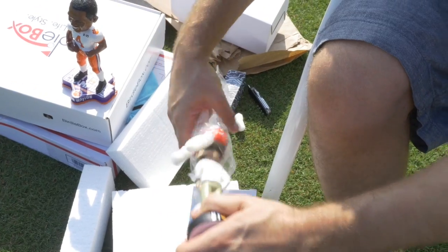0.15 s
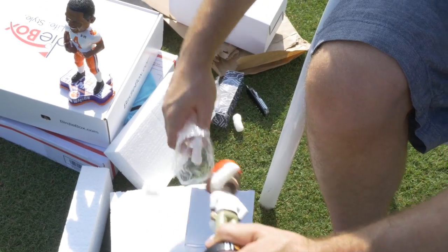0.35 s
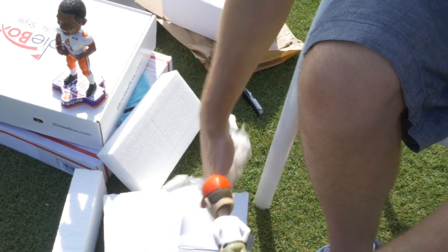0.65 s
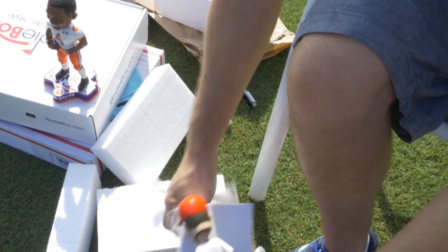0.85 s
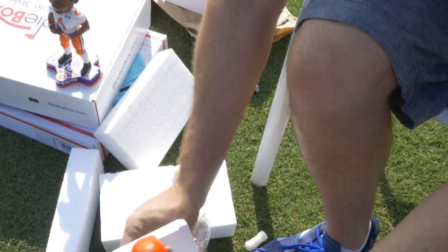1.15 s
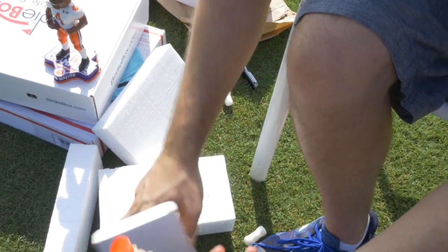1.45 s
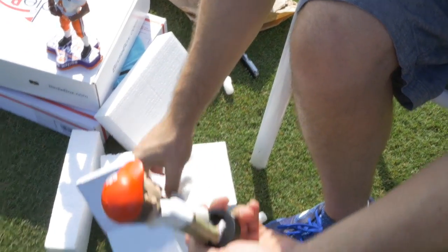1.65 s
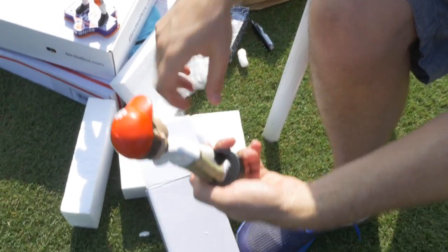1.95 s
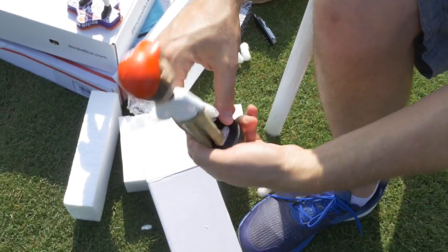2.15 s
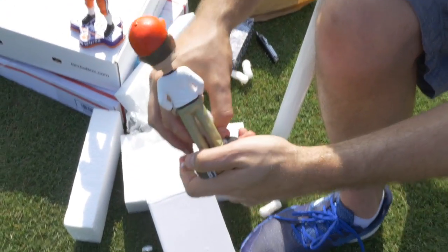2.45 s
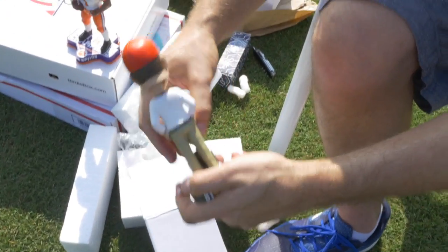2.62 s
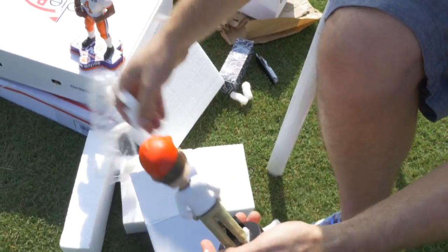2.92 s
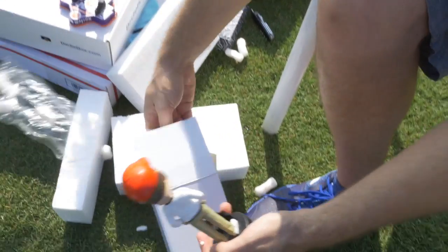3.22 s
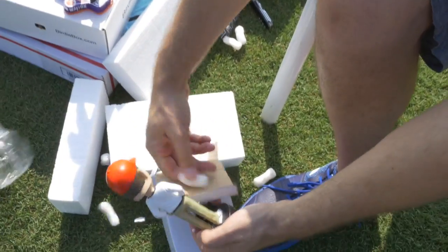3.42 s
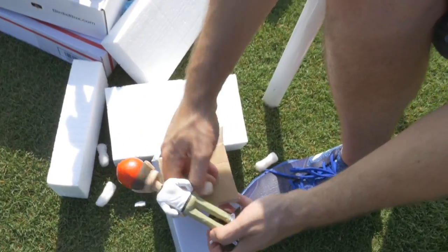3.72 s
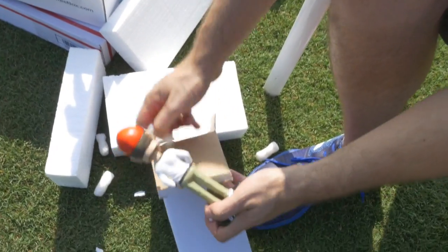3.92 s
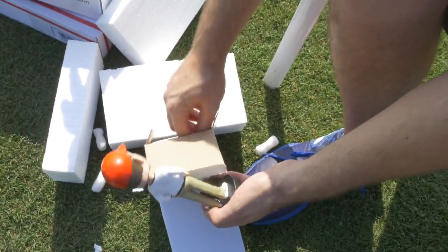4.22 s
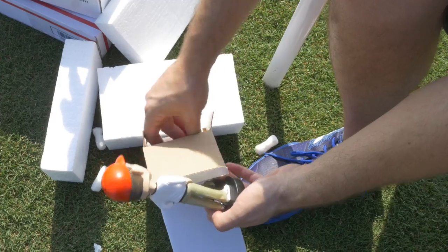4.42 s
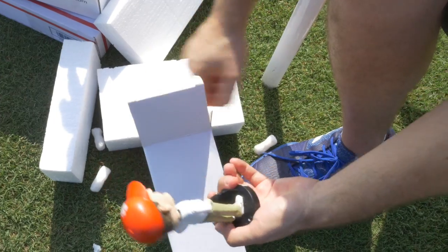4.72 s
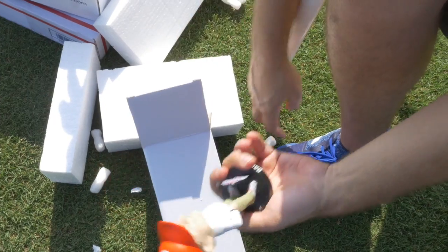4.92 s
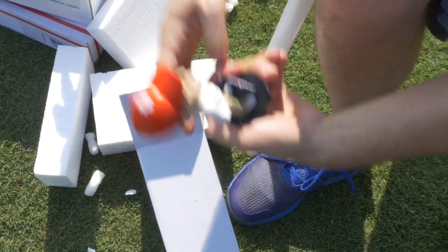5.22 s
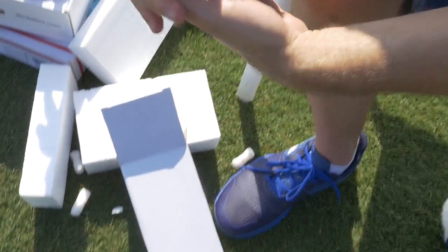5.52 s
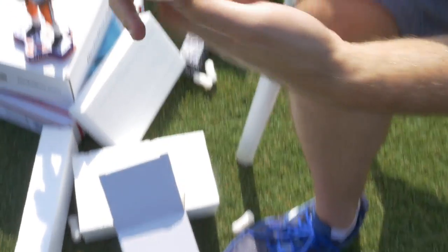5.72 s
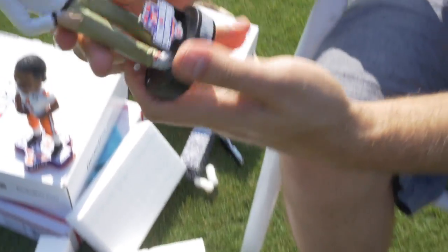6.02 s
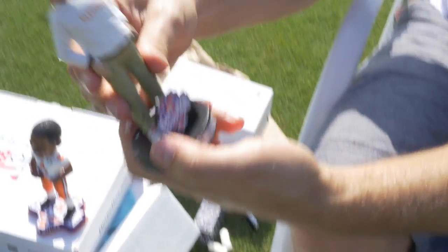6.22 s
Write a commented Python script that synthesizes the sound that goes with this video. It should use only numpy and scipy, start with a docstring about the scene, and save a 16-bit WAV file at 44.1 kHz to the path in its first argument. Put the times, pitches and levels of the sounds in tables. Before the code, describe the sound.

Crinkling film, hollow cardboard and foam thumps and small dry clicks of a bobbing toy head, close up on a lawn with distant traffic.

```python
"""Outdoors on a lawn, hands pull thin plastic wrap off a figurine and shift foam blocks and a card box.
The wrap hisses with clumped noise slips, crackles with short pops and snaps with noise bursts.
The box knocks with decaying modes and a noisy crack; the figurine's loose head ticks on its spring as modes.
Underneath lie far traffic (shaped noise), an engine drone (wavering sine) and insects (sines and noise)."""
import sys
import numpy as np
from scipy import signal
from scipy.fft import rfft, irfft
from scipy.io import wavfile
from scipy.ndimage import uniform_filter1d

SR = 44100
rng = np.random.default_rng(int(sys.argv[2]) if len(sys.argv) > 2 else 0)


def generate_wav(signal):
    """Clip the signal to [-1, 1] and save it as 16-bit WAV at the path in sys.argv[1]."""
    frames = np.transpose(np.atleast_2d(signal))
    scaled = np.clip(frames, -1, 1) * 32767
    pcm = np.round(scaled).astype(np.int16)
    wavfile.write(sys.argv[1], SR, pcm)


N = 280696


def gain_of(db):
    """Decibels to amplitude."""
    return 10 ** (np.asarray(db) / 20)


def evened(x):
    """Scaled to unit rms."""
    return x / np.sqrt(np.mean(x ** 2) + 1e-20)


def curve(rows):
    """Columns of a time table, interpolated at every sample."""
    s, *columns = np.transpose(rows)
    return [np.interp(np.arange(N) / SR, s, c) for c in columns]


def add(mix, s, sound):
    """Mixes a sound in at time s, in place."""
    part = mix[round(s * SR):][:len(sound)]
    part += sound[:len(part)]


def colour(x, shape):
    """Shapes x by a spectrum of (frequency [Hz], level [dB]), to unit rms."""
    hz, db = np.transpose(shape)
    f = np.fft.rfftfreq(N, 1 / SR) + 1
    shape_db = np.interp(np.log(f), np.log(hz), db, -100, -100)
    return evened(irfft(rfft(x) * gain_of(shape_db), N))


def wander(cutoff_hz):
    """Slow random drift of unit rms: low-passed noise."""
    lowpass = signal.butter(2, cutoff_hz, fs=SR, output="sos")
    return evened(signal.sosfilt(lowpass, rng.standard_normal(N)))


def ring(modes, rise_s):
    """Decaying modes, peak 1; each blow detunes them slightly and gives them random polarity."""
    hz, db, t60 = np.transpose(modes)[:, :, None]
    t = np.arange(SR // 8) / SR
    detune, way = rng.standard_normal((2, *hz.shape))
    decay = gain_of(db - 60 * t / np.maximum(t60, .003))  # no mode dies faster than 3 ms
    x = np.sign(way) * decay * np.sin(2 * np.pi * hz * (1 + .012 * detune) * t)
    x = x.sum(0) * (1 - np.exp(-t / rise_s))  # the contact takes a moment
    return x / abs(x).max()


def puff(lo_hz, hi_hz, t60):
    """A short decaying burst of band noise, peak 1."""
    t = np.arange(SR // 16) / SR
    band = signal.butter(3, [lo_hz, min(hi_hz, SR * .45)], "band", fs=SR, output="sos")
    burst = rng.standard_normal(len(t)) * gain_of(-60 * t / max(t60, .001))
    x = signal.sosfilt(band, burst)
    return x / abs(x).max()


def peaks(rows, floor_db):
    """Level in dB of a floor plus peaks that rise and fall evenly in dB; their powers add."""
    slope_db = 12  # change over one rise or fall time
    t, power = np.arange(N) / SR, gain_of(floor_db) ** 2
    for s, db, rise, fall in rows:
        away = np.where(t < s, (s - t) / rise, (t - s) / fall)
        power = power + gain_of(db - slope_db * away) ** 2
    return 10 * np.log10(power)


def traffic():
    """Far traffic wash: broad noise, weighted low, that swells a little."""
    # traffic spectrum: (frequency [Hz], density [dB per Hz])
    wash_shape = [(20, -30), (45, -10.5), (90, 2), (150, -3), (400, -13), (650, -20), (1120, -21),
                  (1900, -34), (3500, -40.5), (7000, -65), (10500, -67), (11400, -78), (15900, -70)]
    level_db = -43 + 0.86 * wander(1.8)
    return gain_of(level_db) * colour(rng.standard_normal(N), wash_shape)


def engine_drone():
    """Distant engine: one sine at the firing rate, unsteady in pitch and level."""
    # engine course: (time [s], mean firing rate [Hz], mean level [dB])
    engine_course = [(0, 148, -55.5), (.9, 152.2, -51), (1.25, 154, -48), (1.55, 140.5, -50),
                     (1.8, 124.3, -50.5), (2.3, 127.9, -41.5), (2.8, 133.4, -42.5), (3.5, 139, -41),
                     (4.2, 145.3, -44), (4.8, 148, -42.5), (5.5, 152.2, -44.5), (5.9, 140, -52),
                     (6.4, 135, -46.5)]
    hz, db = curve(engine_course)
    turns = np.cumsum(hz * (1 + .012 * wander(10))) / SR
    gusts_db = 2.6 * wander(14)  # air on the way makes the tone come and go
    return np.sqrt(2) * gain_of(db + gusts_db) * np.sin(2 * np.pi * turns)


def cricket():
    """Bouts of evenly spaced sine pulses, each gliding down and louder than the one before."""
    # cricket bouts: (start time [s], first pulse level [dB])
    bouts = [(4.645, -68), (4.897, -76), (5.13, -76), (5.478, -74), (5.835, -77), (6.102, -72)]
    # size of each bout: (pulses [count])
    pulse_counts = [1, 2, 3, 2, 1, 4]
    gap_s, swell_db, pulse_s = 0.039, 3.5, 0.031
    out, t = np.zeros(N), np.arange(round(pulse_s * SR)) / SR
    glide = np.sin(2 * np.pi * (4520 * t - 4000 * t ** 2))
    pulse = np.sqrt(2) * glide * signal.windows.tukey(len(t), .6)
    for (s, db), count in zip(bouts, pulse_counts):
        for k in range(count):
            add(out, s + k * gap_s, gain_of(db + k * swell_db) * pulse)
    return out


def insect_chorus():
    """Far insects blended into a narrow band of flickering noise."""
    # chorus spectrum: (frequency [Hz], density [dB per Hz])
    chorus_shape = [(9000, -14), (9600, 0), (10100, -3), (10700, -3), (11200, -16)]
    level_db = -72 + 1.3 * wander(30)
    return gain_of(level_db) * colour(rng.standard_normal(N), chorus_shape)


def insect_trill():
    """A thin, faint sine near 8450 Hz with unsteady pitch, throbbing level and bursts."""
    # trill bursts: (peak time [s], level [dB], half length [s])
    bursts = [(4.79, -76, .015), (5.34, -74, .1), (5.62, -69, .05), (5.81, -65, .03), (6.04, -68, .06),
              (6.09, -65, .04)]
    turns = np.cumsum(8450 * (1 + 0.00334 * wander(64))) / SR
    throb_db = 3.5 * wander(45)
    trill_db = peaks([(s, db, half, half) for s, db, half in bursts], -90)
    return gain_of(trill_db + throb_db) * np.sin(2 * np.pi * turns)


def head_ticks():
    """The loose head meets the neck, rings in short modes with a hard edge, and bounces once."""
    # contacts: (time [s], level [dB], nominal contact pitch [Hz], other head modes [relative dB],
    # hard edge [relative dB], bounce [relative dB])
    ticks = [(.1525, -35, 2250, 5, -5, -12), (.17, -33, 3080, -13, 2, -15), (.183, -29, 2480, -5, -16, -26),
             (.4888, -35.5, 2410, -6, -20, -4), (1.1038, -34.5, 2250, -17, -11, -6),
             (1.368, -28, 1950, -9, -3, -20), (1.4644, -38.5, 2030, -12, -14, -15),
             (1.5523, -27, 2210, -8, -12, -20), (1.7044, -35, 1870, -5, 2, -21),
             (1.9904, -36.5, 2020, -3, -13, -6), (2.3284, -40.5, 2040, -4, -11, -15),
             (2.3561, -38, 1960, 0.1, -7, -23), (2.4226, -42, 1860, -4, 1, 5),
             (2.511, -41, 2020, -10, -9, -6), (2.6803, -40.5, 1900, -6, -7, -7),
             (3.3174, -34.5, 1780, -1, -3, -11), (3.495, -31, 2150, 5, -4, -13),
             (3.5574, -30.5, 1890, 3, 2, -0.6), (3.722, -39, 2150, -3, -9, -7),
             (3.7504, -46, 2706, 4, -11, -17), (3.769, -45, 2690, 3, -12, -19),
             (5.2215, -41, 1930, -12, -5.5, 4.5), (5.411, -32.5, 1970, -22, -22, -15),
             (5.4546, -26.5, 2230, -29, -8, -15), (5.4595, -27, 1960, -17, -21, -28),
             (5.6045, -44.5, 1950, -16, -4, 0), (5.6342, -40, 1840, -11, -13, -21),
             (5.7358, -25.5, 1820, -1, -1, -9.5), (5.7675, -44, 1730, -5, 0, -17),
             (5.819, -44, 1850, -10, -9, -10), (5.9118, -26.5, 1890, -5.5, -2.5, -7),
             (6.0295, -33.5, 1970, 4.5, -16, 0.3), (6.2166, -31, 1982, 2.5, -12, -18),
             (6.2354, -43, 2006, 0, -15, -12), (6.3205, -47, 1785, -3, -7, -9),
             (6.3335, -41.5, 2360, -3, -21, -8)]
    # head modes: (nominal frequency [Hz], level [dB], t60 [s])
    head_modes = [(2480, 0, .02), (2750, -7, .014), (3080, -5, .014), (3500, -8, .012), (4200, -11, .01)]
    # hard edge modes: (nominal frequency [Hz], level [dB], t60 [s], at least 0.003 in use)
    shell_modes = [(5000, -1, 0.0046), (5840, 5, 0.0028), (6500, -12, 0.0038), (7930, -2, 0.0055),
                   (10700, 4.5, 0.0027)]
    contact_t60, bounce_s = .017, .0093  # s; the neck damps the head at once
    out = np.zeros(N)
    for s, db, hz, rest_db, hard_db, bounce_db in ticks:
        head = ring([(hz, 0, contact_t60)], .0003) + gain_of(rest_db) * ring(head_modes, .0003)
        first = head + gain_of(hard_db) * ring(shell_modes, .0002)
        bounce = head + gain_of(hard_db - 2) * ring(shell_modes, .0002)  # softer edge
        add(out, s, gain_of(db) * first)
        add(out, s + bounce_s, gain_of(db + bounce_db) * bounce)
    return out


def box_knocks():
    """Blows on box and foam: the struck wall, low walls and small flaps ring, with punch and crack."""
    # blows: (time [s], level [dB], nominal pitch of the struck wall [Hz], low walls [relative dB],
    # small flaps [relative dB])
    knocks = [(0.4337, -19, 722, -6.5, -27), (.621, -31, 407, 2.5, -24), (.702, -33, 428, 0, -5),
              (0.8162, -27.5, 450, 3, -10), (0.8275, -21, 572, 0.5, -0.5), (.834, -21, 560, 1.5, -20),
              (0.8887, -29, 366, 6.5, 11.5), (0.894, -25, 557, -3, -12), (.904, -39, 290, 17, 10),
              (.913, -34, 577, -3, 4.5), (.959, -37.5, 364, 6, 2), (1.136, -36, 534, -11, 0),
              (1.464, -35.5, 513, 1.5, -18), (1.554, -38, 813, 6.5, 8), (1.618, -30, 457, -9, -19),
              (1.974, -37.5, 383.5, -0.5, -12), (3.197, -34, 450, -16, -7), (3.232, -35, 778, 2, -10),
              (3.336, -11, 450, -3.5, -18), (3.348, -34, 397, -6, -25), (3.375, -13.5, 363, -5, -4),
              (3.383, -23.5, 385, 2, -26), (3.39, -20, 293, -4, -20), (3.415, -32.5, 418, -2, -7),
              (3.44, -5.5, 885, -8, -3), (3.482, -34, 540, -5, 5), (3.559, -35, 1090, 1, -5),
              (3.694, -13.5, 527, -11.5, -8), (3.705, -27, 295, -16, -8), (3.88, -26.5, 320, 1, -4),
              (3.892, -31.5, 310, 0, 1.5), (3.902, -29, 560, -18, -11), (4.0453, -24, 420, -22, -30),
              (4.068, -20, 538, -9, -33), (4.136, -34, 500, -7, -19)]
    # low wall modes: (nominal frequency [Hz], level [dB], t60 [s])
    wall_modes = [(290, 0, 0.096), (372, 4, 0.1), (450, -6.5, 0.19), (560, 6, 0.061), (848, 8.5, 0.041)]
    # small flap modes: (nominal frequency [Hz], level [dB], t60 [s])
    flap_modes = [(1260, 6, 0.015), (1330, 12, 0.0067), (1580, 1.5, 0.022), (1780, 2.5, 0.016)]
    wall_t60, hard_t60, hard_db = 0.053, .03, -16  # s, s, dB
    out = np.zeros(N)
    for s, db, hz, low_db, flap_db in knocks:
        t60 = hard_t60 if db > hard_db else wall_t60  # hard blows press the wall dead sooner
        crack_db = -10.5 + 0.78 * flap_db  # the crack grows with the rattle of the flaps
        walls = ring([(hz, 0, t60)], 0.00092)
        walls += gain_of(low_db) * ring(wall_modes, 0.00077)
        walls += gain_of(flap_db) * ring(flap_modes, 0.00044)
        add(out, s, gain_of(db) * walls)
        punch = ring([(0.56 * hz, -3, .012), (1.43 * hz, 0.1, .012)], 0.0006)
        add(out, s, gain_of(db - 4.5) * punch)  # the air pushed out by the blow
        add(out, s, gain_of(db - 15) * puff(300, 1700, .07))  # loose card answers with a low papery burst, 300-1700 Hz
        add(out, s, gain_of(db + crack_db) * puff(890, 4900, 0.027))
    return out


def wrap_snaps():
    """Larger creases pop in the wrap: brief noise bursts around their own pitch."""
    # snaps: (time [s], level [dB], pitch [Hz])
    snaps = [(.072, -33, 7520), (.237, -45, 7660), (.5506, -39, 10600), (.89, -31, 8470),
             (1.0271, -32.5, 10000), (1.0959, -46, 8950), (1.2, -40, 10200), (1.41, -43, 9300),
             (1.552, -22.5, 7200), (1.698, -31, 6630), (1.977, -32.5, 7110), (2.031, -37.5, 8370),
             (2.122, -35, 6560), (2.359, -46, 7040), (2.663, -45, 6790), (3.0799, -37, 6000),
             (3.166, -37, 9680), (3.2267, -30, 5300), (3.322, -35, 7070), (3.3654, -33, 5910),
             (3.483, -42, 10060), (3.553, -35, 5060), (3.693, -38, 12060), (3.7713, -41, 6990),
             (4.076, -20, 10800), (4.196, -41, 8260), (4.389, -38, 10700), (5.464, -48, 6840),
             (5.7352, -32, 5800), (5.91, -29, 8000), (6.0226, -39, 9900)]
    out = np.zeros(N)
    for s, db, hz in snaps:
        add(out, s, gain_of(db) * puff(hz * 0.69, hz * 1.65, 0.016))
    return out


def crackle(per_s, count):
    """Single creases pop, each a few cycles at one of count pitches; a few are large."""
    size_db = 3.4 * np.minimum(rng.exponential(1, N), 5)
    size = gain_of(size_db) * (rng.random(N) < per_s / SR)
    crease, t, out = rng.integers(0, count, N), np.arange(200) / SR, np.zeros(N)
    for k, hz in enumerate(np.geomspace(3800, 13000, count)):
        pop = np.sin(2 * np.pi * hz * t) * np.exp(-t * hz / 2.0)
        out += signal.oaconvolve(size * (crease == k), pop / np.linalg.norm(pop))[:N]
    return evened(out)


def rubbing():
    """Countless tiny slips of unequal size arrive in clumps; film, foam and card ring with them by turns."""
    # single strokes over wrap, foam and card: (peak time [s], hiss level [dB], rise [s], fall [s])
    strokes = [(.06, -46, 0.038, .2), (.165, -38, 0.11, 0.024), (.22, -42.5, 0.035, 0.053),
               (.75, -53, 0.16, 0.38), (1.1, -43.5, 0.021, 0.046), (1.23, -45, 0.07, .23),
               (1.55, -45.5, 0.059, .045), (1.7, -45, 0.01, 0.18), (1.975, -54, 0.23, 0.023),
               (2.04, -58, .03, .03), (2.13, -45.5, 0.021, 0.078), (2.3, -50, 0.11, 0.016),
               (2.59, -47.5, 0.078, 0.06), (2.68, -45, 0.026, 0.023), (3.09, -63, 0.06, .3),
               (3.23, -55, 0.11, 0.061), (3.33, -61, 0.077, .024), (3.38, -41.5, 0.014, .03),
               (3.44, -36, 0.038, 0.016), (3.5, -42, 0.043, .04), (3.56, -41, 0.019, 0.033),
               (3.69, -44, 0.03, 0.047), (3.97, -52, .2, .1), (4.09, -33, 0.011, 0.012),
               (4.19, -48.5, 0.026, .08), (4.42, -45.5, 0.12, 0.081), (4.5, -53, 0.13, 0.029),
               (4.57, -56.5, 0.042, 0.08), (5.7, -65.5, .25, 0.27)]
    # rustle between strokes and the colour of all rubbing: (time [s], level [dB], film pitch [Hz],
    # film ring [dB], foam near 2.6 kHz [relative dB], middle near 4.8 kHz [relative dB],
    # card, low [relative dB], top treble [relative dB])
    rustle = [(0, -77, 10300, 0, 5.5, -2, 13, -6.5), (.6, -56, 9700, 7, 9, -22, 0, -5),
              (1, -52.5, 9500, 3, 4, 6.5, 17.5, -8), (1.3, -56, 8800, 12, 7, -7, 12.5, 0),
              (1.75, -59, 6500, 7, 3.5, 0.5, 15, -1), (2.1, -70, 6500, 13, 4, 3, 3, 2),
              (2.55, -55.5, 6650, 14, -4, -22, -2, -2), (2.75, -60.5, 6960, 13, -1.5, -5, 4, 4),
              (3.15, -68, 6240, 13, 11.5, 8.5, 0, 1), (3.43, -67, 7400, -4, 6.5, -1, 9.5, -8),
              (3.62, -50, 9500, 0, 7, 2, 14, -3), (3.78, -80, 9600, 3, 8, 0, 12, -4),
              (4.12, -58, 9250, 1, 11, 4, 14.5, -5), (4.45, -79, 9800, 0, 8, -1, 14.5, -7),
              (4.75, -71, 9000, -9, 4.5, 0, 26.5, -16), (6.36, -65.5, 7998, -5, 5, 4, 20, -11)]
    # bare film hiss: (frequency [Hz], density [dB per Hz])
    film_shape = [(2500, -60), (5500, -8), (7000, -5), (12000, -1), (15800, -2.5)]
    sizes = gain_of(0.38 * np.minimum(rng.exponential(1, N), 6))
    slips = sizes * rng.standard_normal(N) * (rng.random(N) < 9000 / SR)  # 9000 slips per second
    clumps = gain_of(1.47 * wander(69) + 1.0 * wander(39))
    frames = dict(fs=SR, nperseg=256, noverlap=192)
    hz, t, z = signal.stft(slips * clumps, **frames)
    hz = hz[:, None]
    patches = uniform_filter1d(uniform_filter1d(rng.standard_normal(z.shape), 8, 0), 30, 1)
    z = z * gain_of(2.04 * evened(patches))  # different folds sound at different moments

    s, _, *columns = np.transpose(rustle)
    film_hz, film_db, foam_db, mid_db, card_db, top_db = (np.interp(t, s, c) for c in columns)

    def bell(centre_hz, width_hz):
        """A smooth resonance over frequency, peak 1."""
        return np.exp(-((hz - centre_hz) / width_hz) ** 2)

    f, db = np.transpose(film_shape)
    film = gain_of(np.interp(hz, f, db) + film_db * bell(film_hz, 2340))
    film = film * gain_of(top_db * np.clip(hz / 3000 - 3.3, 0, 1))  # top treble tilts from 9.9 kHz
    film = film / np.sqrt((film ** 2).mean(0))  # colour alone, equal power in every frame
    rest = gain_of(foam_db) * bell(2650, 1160)
    rest = rest + gain_of(mid_db) * bell(4750, 560)
    rest = rest + gain_of(card_db) * bell(445, 1004)

    treble = evened(signal.istft(z * film, **frames)[1][:N])
    body = signal.istft(z * rest, **frames)[1][:N] / np.std(slips)
    level_db = peaks(strokes, curve(rustle)[0])
    return gain_of(level_db) * (treble + body + gain_of(-5) * crackle(900, count=24))


def with_echoes(near):
    """Adds sparse early reflections: ground, boxes and legs throw sound back within 27 ms."""
    echoes = np.zeros(1200)
    echoes[rng.integers(100, 1200, 14)] = rng.standard_normal(14)
    echoes *= gain_of(-22 - 500 * np.arange(1200) / SR)  # later echoes are weaker
    return near + signal.oaconvolve(near, echoes)[:N]


def scene():
    """Close blows with their echoes, over rubbing and surroundings."""
    background = traffic() + engine_drone() + cricket() + insect_chorus() + insect_trill()
    blows = head_ticks() + box_knocks() + wrap_snaps()
    softening = signal.butter(2, 11000, fs=SR, output="sos")  # no contact is perfectly hard
    near = signal.sosfilt(softening, blows)
    return (background + with_echoes(near) + rubbing())[None]


def record(dry):
    """Steep low-pass at 15.9 kHz: the band limit of the recorder."""
    lowpass = signal.firwin(1023, 15900, window=("kaiser", 9), fs=SR)
    return signal.oaconvolve(dry, lowpass[None], "same")


dry = scene()
out = record(dry)
generate_wav(out)
```